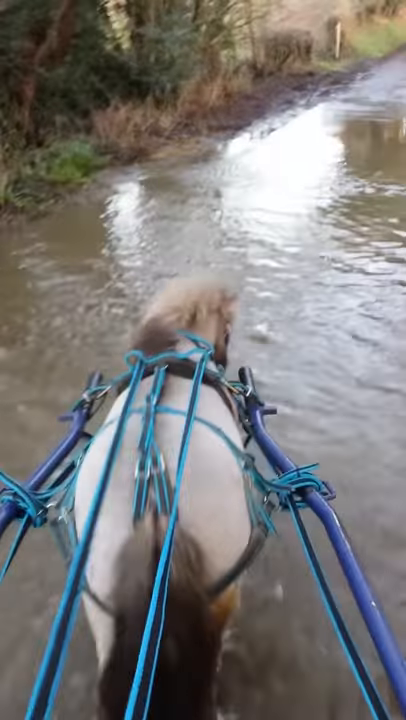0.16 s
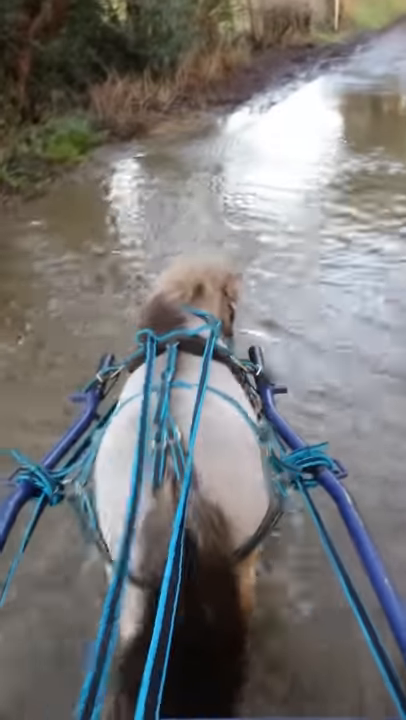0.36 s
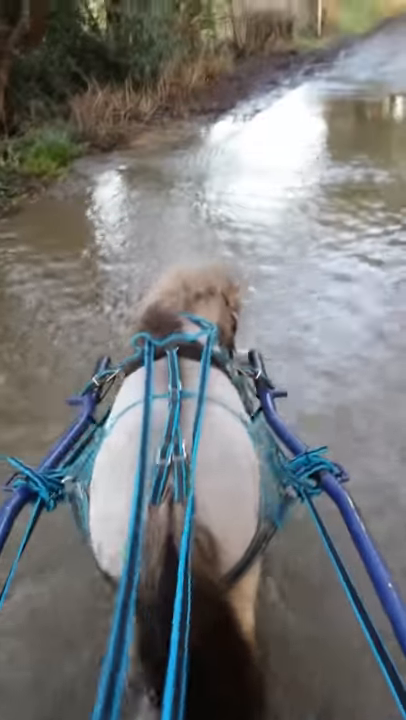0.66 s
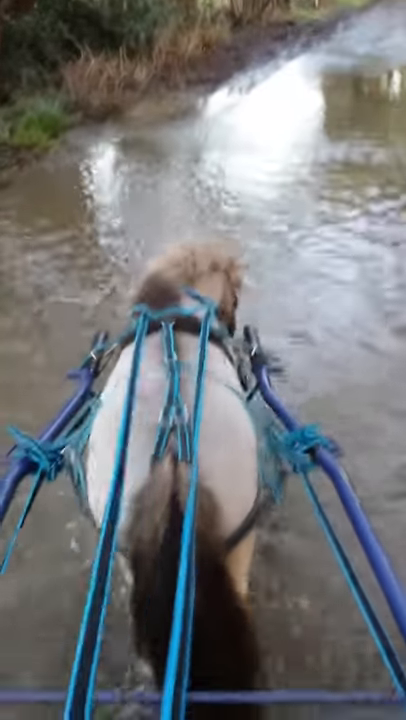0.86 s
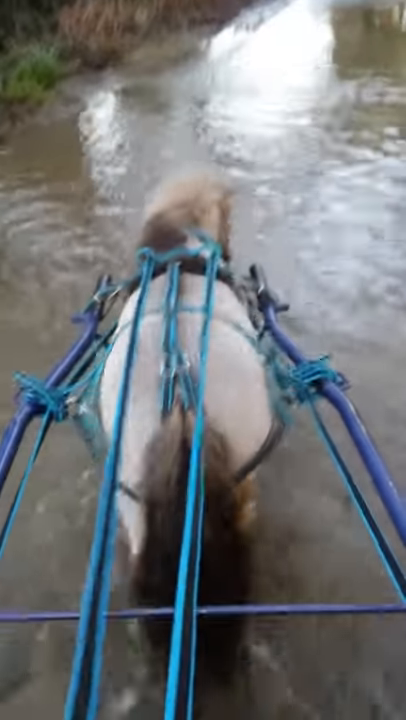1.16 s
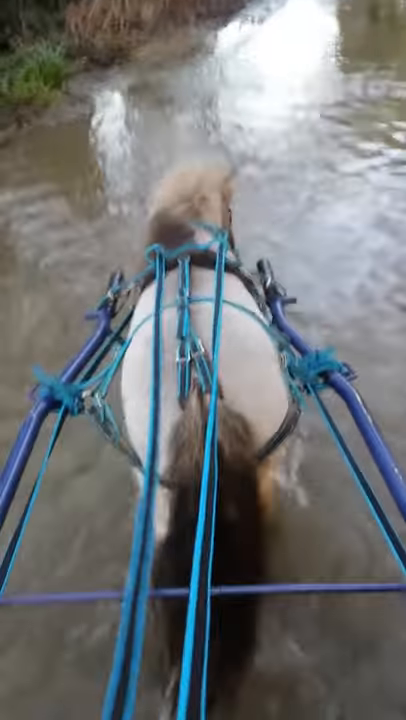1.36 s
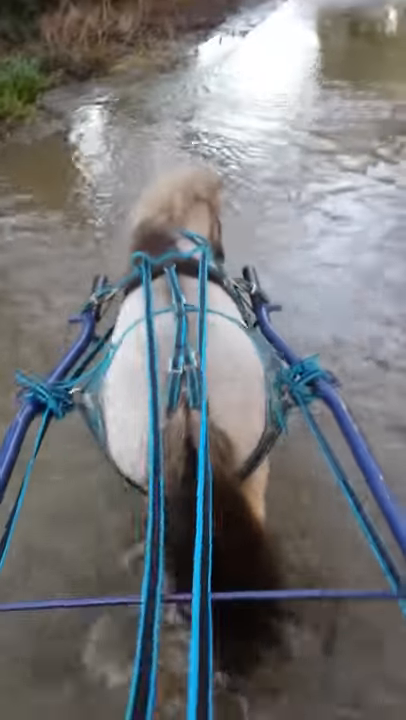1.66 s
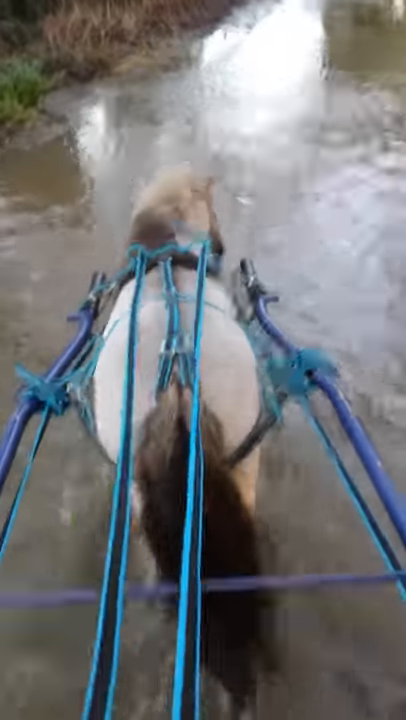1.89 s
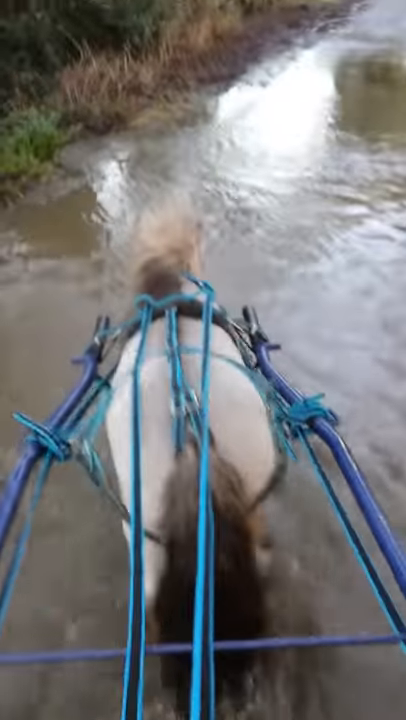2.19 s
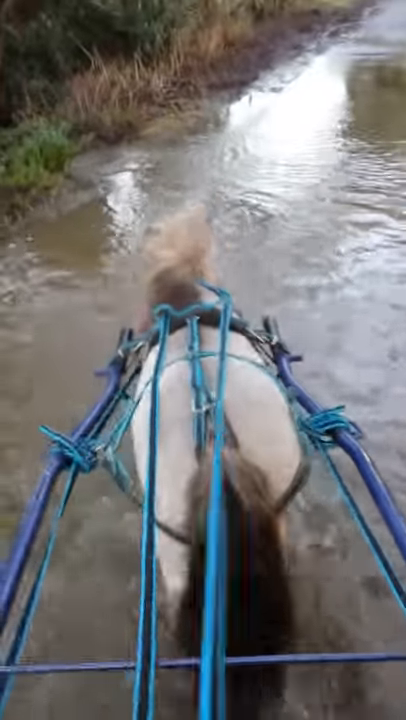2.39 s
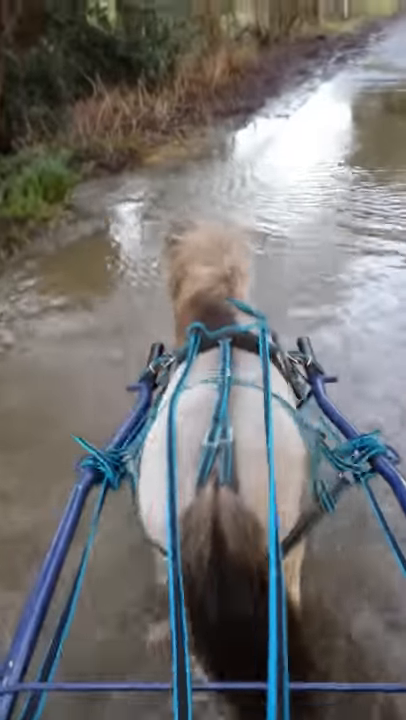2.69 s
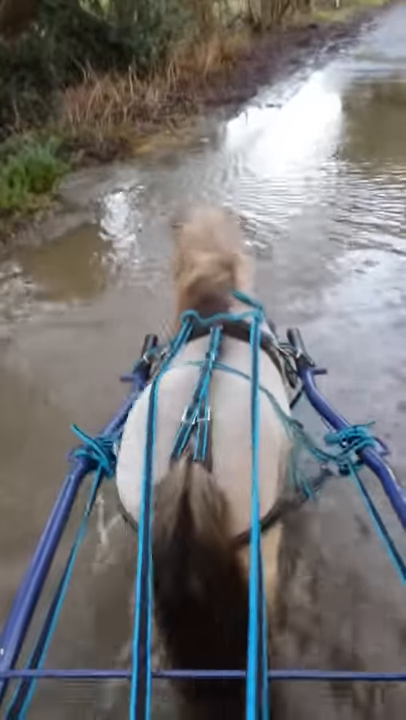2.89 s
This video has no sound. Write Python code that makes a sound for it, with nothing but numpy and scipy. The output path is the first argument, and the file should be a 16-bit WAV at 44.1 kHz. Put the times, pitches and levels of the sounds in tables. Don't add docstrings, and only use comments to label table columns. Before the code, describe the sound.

From 0 to 3 seconds, a pony pulls a cart through floodwater, heard close from the seat. A steady hissing rush carries splashes roughly every quarter second, with hollow glugs, ringing bubbles and fine drops. Sharp slaps stand out near 0.2, 1.2, 1.8, 2.2 and 2.7. Low wind thumps hit the right microphone from 1.5, strongest around 2.3 to 2.8, then ease.

```python
import sys
import numpy as np
from scipy import signal
from scipy.fft import rfft, irfft
from scipy.io import wavfile
from scipy.ndimage import uniform_filter1d

SR = 44100
rng = np.random.default_rng(int(sys.argv[2]) if len(sys.argv) > 2 else 0)


def int16_out(signal):
    q = np.round(np.clip(np.atleast_2d(signal).T, -1, 1) * 32767)
    wavfile.write(sys.argv[1], SR, q.astype(np.int16))


def magnitude_from_level(level_db):
    exponent = np.asarray(level_db, float) / 20
    return 10 ** exponent


N = 134064

# time in seconds, spray level in dB, froth level in dB,
# spray decay in seconds.
STRIDES = [(0.0, -31, -30, .05), (0.213, -26.5, -30.5, 0.06), (0.493, -33.5, -33, 0.022),
           (0.688, -28, -27.5, 0.11), (0.991, -32.5, -34.5, 0.029), (1.187, -29.5, -30.5, 0.13),
           (1.489, -28, -34, 0.029), (1.7, -24.5, -28.5, 0.054), (1.98, -30.5, -33, 0.052),
           (2.215, -26, -28, 0.035), (2.489, -33, -32.5, 0.03), (2.621, -32, -41.5, 0.091),
           (2.719, -34, -27.5, 0.1), (2.986, -32, -30, 0.27)]
# loudest moment in seconds, peak in dB, pitch in Hz.
LARGE_BUBBLES = [(0.007, -21, 620), (0.018, -25, 720), (0.048, -18.5, 673), (0.058, -18, 570),
                 (0.239, -10.5, 658), (0.253, -19, 720), (0.295, -18.5, 610), (0.534, -22.5, 654),
                 (0.563, -21, 590), (0.727, -17, 620), (0.749, -22, 800), (0.764, -17.5, 625),
                 (1.248, -11.5, 672), (1.262, -28, 656), (1.288, -18, 745), (1.721, -19.5, 790),
                 (1.732, -16, 733), (2.302, -19.5, 684), (2.513, -24.5, 990), (2.634, -22.5, 640),
                 (2.654, -25, 597), (2.765, -34, 680), (2.807, -21, 665), (3.033, -19.5, 777)]
# start in seconds, peak in dB, pitch in Hz, decay in seconds.
PLOPS = [(.009, -20, 1800, 0.0037), (.045, -22, 1000, .004), (.212, -35, 940, 0.0028),
         (0.232, -23, 1110, 0.0045), (0.4954, -15, 315, 0.0049), (.4955, -16, 548, 0.0056),
         (0.525, -19, 1150, 0.0047), (.697, -21, 1210, 0.0056), (0.768, -19, 1210, 0.0033),
         (0.91, -22, 1380, 0.0056), (.946, -24.5, 960, 0.0067), (0.992, -12.5, 1260, .0015),
         (.991, -17, 516, 0.0035), (1.085, -22.5, 1100, 0.0047), (1.193, -21, 1307, .007),
         (1.24, -14, 750, 0.0039), (1.28, -18, 987, 0.004), (1.477, -18.5, 920, 0.0041),
         (1.501, -24, 1510, 0.0028), (1.699, -20.5, 1224, 0.013), (1.74, -22, 716, .006),
         (1.768, -19, 780, 0.009), (1.979, -24, 1000, 0.0084), (2.216, -12, 1220, 0.0021),
         (2.248, -21, 905, 0.0076), (2.264, -27, 624, .006), (2.292, -20.5, 957, 0.0096),
         (2.336, -23.5, 830, 0.0058), (2.5, -21.5, 990, 0.0036), (2.608, -24, 1420, 0.003),
         (2.63, -20, 898, 0.0069), (2.634, -23, 1370, 0.0076), (2.722, -22, 795, 0.0069),
         (2.73, -19, 1440, .003), (2.744, -16, 1170, 0.0026), (2.753, -19.5, 644, 0.0054),
         (2.769, -23, 930, 0.0034), (2.802, -25, 1000, 0.0046), (2.82, -23.5, 944, 0.0094),
         (2.837, -25, 850, .008), (2.993, -18.5, 1250, .005), (3.01, -14, 940, 0.0037),
         (2.54, -25, 955, .012), (.233, -19.5, 630, .008), (.109, -19.5, 1140, 0.0076)]
# loudest moment in seconds, peak in dB, pitch in Hz,
# length in cycles.
GLUGS = [(0.063, -15, 215, 4.6), (.295, -20, 249, 2.46), (0.568, -21.5, 208, 4.3), (0.766, -29, 230, 3.7),
         (0.991, -24, 290, 2.2), (1.053, -27, 230, 7.5), (1.283, -25.5, 304, 3.6),
         (1.575, -21.5, 203.4, 9.2), (1.782, -20, 240, 5.2), (2.001, -20, 315, 3.44),
         (2.033, -27, 260, 4.8), (2.061, -26, 240, 4.5), (2.301, -24, 273, 3.4), (3.01, -28, 260, 3.4),
         (2.52, -23, 322, 3.2), (2.631, -16, 312, 3.24)]
# loudest moment in seconds, peak in dB, pitch in Hz, length in cycles.
RISER = (2.686, -22.5, 600, 17)
# loudest moment in seconds, peak in dB, pitch in Hz.
DROPS = [(.299, -28, 2300), (0.346, -24.5, 3320), (0.466, -30, 7350), (0.772, -24.5, 2700),
         (.808, -25, 7500), (0.156, -26.5, 3100), (.141, -24, 7900), (.172, -22, 7370), (0.572, -27, 5710),
         (.698, -17.5, 8800), (.821, -25.5, 3160), (.851, -25, 8000), (0.883, -25, 3900), (0.93, -26, 3160),
         (1.13, -26, 7920), (1.5, -24.5, 2860), (1.71, -19.5, 4090), (1.7133, -18.5, 6300),
         (1.733, -27, 3160), (0.214, -23, 5200), (2.315, -30, 2410), (2.517, -26.5, 2980),
         (2.7325, -22, 3610), (2.753, -23, 2550), (2.79, -24, 2500), (2.804, -22, 2630),
         (1.167, -19.5, 3930), (1.181, -27, 7300), (1.2058, -13.5, 3800), (1.223, -25, 7300),
         (1.276, -17.5, 4330), (1.606, -22.5, 7300), (1.787, -17, 6130), (2.524, -19.5, 7760),
         (2.687, -18, 7760)]
# time in seconds, peak in dB.
SMACKS = [(0.2129, -7.5), (0.2268, -15), (0.6968, -18), (0.9911, -28), (1.2036, -6), (1.701, -18),
          (1.7871, -10.5), (2.2164, -9.5), (2.7104, -11.5), (2.7302, -6), (3.0091, -24)]
# time in seconds, level in dB.
GUST = [
    (0.0, -52.5),
    (2.74, -42),
    (3.04, -51),
]
# time in seconds, peak in dB, pitch in Hz.
EDDIES = [(1.474, -16, 104), (1.847, -15, 109), (1.867, -22, 112), (1.893, -13.5, 96), (1.91, -40, 99),
          (1.928, -23, 119), (2.011, -14.5, 155), (2.221, -14, 150), (2.235, -12, 151), (2.26, -11.5, 146),
          (2.331, -31, 140), (2.348, -7.5, 135), (2.375, -16.5, 95), (2.431, -18, 100), (2.463, -23, 143),
          (2.482, -14.5, 131), (2.5, -15.5, 118), (2.544, -7.5, 176), (2.559, -25, 162), (2.58, -13.5, 114),
          (2.599, -14.5, 113), (2.626, -16, 118), (2.649, -11.5, 135), (2.674, -8.5, 139),
          (2.696, -12, 130), (2.712, -12, 130), (2.745, -10.5, 190), (2.767, -6.5, 190), (2.781, -25, 213)]
# frequency in Hz, gain in dB.
LEFT_COLOUR = [(200, 7), (420, -1), (700, 4.5), (1800, 3.5), (3800, 8), (7000, 0), (10300, -12),
               (14500, -26)]
# frequency in Hz, gain in dB.
RIGHT_COLOUR = [(200, 8), (420, -7.5), (700, 7), (1800, 4), (5000, 4.5), (7200, 9.5), (10500, 1),
                (14500, -5)]
# frequency in Hz, likeness from 0 to 1.
LIKENESS = [(200, 1), (700, 0.89), (1400, 0.61), (3000, 0), (6000, 0.15)]

BUBBLE_WOBBLE = 0.22


def read(points, hz):
    f, value = np.transpose(points)
    return np.interp(np.log(hz + 1), np.log(f + 1), value)


def evened(x):
    return x / np.sqrt(np.mean(x ** 2) + 1e-20)


def add(mix, s, sound):
    at = round(s * SR) - len(sound) // 2
    sound = sound[max(-at, 0):]
    part = mix[max(at, 0):][:len(sound)]
    part += sound[:len(part)]


def band(x, low_hz, top_hz):
    sos = signal.butter(2, [low_hz, min(top_hz, SR / 2.1)], "band", fs=SR, output="sos")
    return signal.sosfilt(sos, x)


def blip(hz, cycles, glide, lean=0.67, phase=0.):
    u = np.linspace(0, 1, int(cycles / hz * SR) + 2)
    swell = np.sin(np.pi * u ** lean) ** 2
    turns = cycles * (u + glide * (u * u - u) / 2)
    return swell * np.sin(2 * np.pi * turns + phase)


def rough(sound, hz, share):
    wobble = uniform_filter1d(rng.standard_normal(4000), size=int(SR / hz))[:len(sound)]
    return sound * (1 + share * wobble / wobble.std())


def grains(per_s, low_hz, top_hz, cycles, glide, spread_db, pitches=24):
    size = magnitude_from_level(spread_db * np.minimum(rng.exponential(1, (2, N)), 5))
    size = size * (rng.random((2, N)) < per_s / SR)
    kind = rng.integers(0, pitches, (2, N))
    swarm = np.zeros((2, N))
    for k, hz in enumerate(np.geomspace(low_hz, top_hz, pitches)):
        one = blip(hz, cycles, glide)[None]
        swarm += signal.oaconvolve(size * (kind == k), one, axes=1)[:, :N]
    return evened(swarm)


def churn():
    a, b, c, d, patches = rng.standard_normal((N // 64 + 5, 129, 5)).T
    patches = uniform_filter1d(patches, size=4, axis=0)
    patches = evened(uniform_filter1d(patches, size=25, axis=1))
    z = np.array([a + 1j * b, c + 1j * d]) * magnitude_from_level(1.8 * patches)
    return evened(signal.istft(z, nperseg=256, noverlap=192)[1][:, :N])


def steady_rush():
    hiss = magnitude_from_level(-33.5) * churn()
    fizz = magnitude_from_level(-45.5) * grains(2500, 1316, 13000, cycles=5.24, glide=0.41, spread_db=5.4)
    gurgle = magnitude_from_level(-43.5) * grains(300, 236.3, 1463, cycles=6.7, glide=0.35, spread_db=1.5)
    return hiss + fizz + gurgle


def strides():
    swing_s, swing_db, froth_s, froth_rise_s = 0.066, -8, 0.14, 0.0011
    t, spray, froth = np.arange(N) / SR, np.zeros(N), np.zeros(N)
    for s, spray_db, froth_db, dies_s in STRIDES:
        u = t - s
        build = magnitude_from_level(swing_db) * np.exp(np.minimum(u, 0) / swing_s)
        decay = np.exp(-abs(u) / dies_s)
        spray += magnitude_from_level(spray_db) * np.where(u < 0, build, decay)
        froth += magnitude_from_level(froth_db) * np.clip(u / froth_rise_s, 0, 1) * np.exp(-(u / froth_s) ** 2)
    return spray, froth


def splashes():
    spray, froth = strides()
    flicker = magnitude_from_level(3.1 * evened(uniform_filter1d(rng.standard_normal(N), size=150)))
    sheet = evened(band(rng.standard_normal((2, N)), 1760, 13200) * flicker)
    droplets = grains(1500, 1326, 11000, cycles=2.36, glide=0.72, spread_db=2.1)
    foam = grains(1600, 450, 2400, cycles=6., glide=.3, spread_db=1.4)
    return magnitude_from_level(-4.5) * (spray * (sheet + 0.67 * droplets) + froth * foam)


def large_bubbles():
    out = np.zeros(N)
    for s, db, hz in LARGE_BUBBLES:
        bubble = blip(hz, cycles=7.3, glide=0.11, lean=0.87)
        add(out, s, magnitude_from_level(db) * rough(bubble, hz, BUBBLE_WOBBLE))
        neighbour_s = s + rng.uniform(-0.00415, .009)
        neighbour = blip(hz * rng.uniform(0.98, 1.56), cycles=7.74, glide=0.055, lean=0.12)
        add(out, neighbour_s, magnitude_from_level(db - 8) * neighbour)
    return out


def plops():
    rise_s, climb = 0.00019, 0.079
    out = np.zeros(N)
    for s, db, hz, dies_s in PLOPS:
        t = np.arange(int(4 * dies_s * SR)) / SR
        envelope = (1 - np.exp(-t / rise_s)) * np.exp(-t / dies_s)
        ring = envelope * np.sin(2 * np.pi * hz * (t + climb * t * t / dies_s / 2))
        add(out, s + 2 * dies_s, magnitude_from_level(db - 2) * rough(ring, hz, BUBBLE_WOBBLE))
    return out


def glugs():
    out = np.zeros(N)
    for s, db, hz, cycles in GLUGS:
        add(out, s + 0.0012, magnitude_from_level(db) * blip(hz, cycles, glide=0.25, lean=0.78, phase=np.pi))
    return out


def riser():
    out = np.zeros(N)
    s, db, hz, cycles = RISER
    add(out, s, magnitude_from_level(db) * blip(hz, cycles, glide=0.97, lean=0.68))
    return out


def trapped_air():
    air = large_bubbles() + glugs() + band(plops() + riser(), 200, 9000)
    echo = np.roll(band(air, 480, 2000), round(0.014 * SR))
    direct = np.array([air, np.roll(air, shift=4)]) * magnitude_from_level(np.array([[-.6], [.4]]))
    return direct + np.array([[.15], [-.15]]) * echo


def drops():
    out = np.zeros((2, N))
    for s, db, hz in DROPS:
        for mix in out:
            phase = 7 * rng.random()
            ring = blip(hz, cycles=6 + 0.00326 * hz, glide=0.11, lean=0.53, phase=phase)
            add(mix, s, magnitude_from_level(db - 4.5) * rough(ring, hz, share=0.55))
    return out


def smacks():
    rise_s, dies_s, snap = .0003, 0.0025, 3
    out, t = np.zeros((2, N)), np.arange(-400, 400) / SR
    shape = np.where(t < 0, np.exp(t / rise_s), np.exp(-t / dies_s))
    burst = rng.standard_normal((len(SMACKS), 2, 800)) + snap * (abs(t - rise_s) < 1 / SR)
    cracks = band(burst, 490, 13000) * shape
    for (s, db), pair in zip(SMACKS, cracks):
        for mix, crack in zip(out, pair):
            add(mix, s + 0.001103, magnitude_from_level(db - 1.5) * np.tanh(crack / np.abs(crack).max()))
    return out


def ports(pair):
    hz = np.fft.rfftfreq(N, 1 / SR)
    same = np.clip(read(LIKENESS, hz), 0, 1)
    z = rfft(pair)
    left, right = irfft([z[0], same * z[0] + np.sqrt(1 - same ** 2) * z[1]], N)
    pair = np.array([left, np.roll(right, shift=6)])
    hz = abs(np.fft.fftfreq(2048, 1 / SR))
    low_cut = hz ** 2 / (hz ** 2 + 74.0 ** 2)
    colour = magnitude_from_level(np.array([read(LEFT_COLOUR, hz), read(RIGHT_COLOUR, hz)]))
    log_gain = np.log(colour * low_cut + 1e-4)
    taps = np.fft.ifft(np.exp(log_gain - 1j * signal.hilbert(log_gain).imag)).real
    return signal.oaconvolve(pair, taps[:, :1024], axes=1)[:, :N]


def wind_rumble():
    mean_db, left_follows = -45.5, 0.028
    gust_db = np.interp(np.arange(N) / SR, *np.transpose(GUST))
    left_db = mean_db + left_follows * (gust_db - mean_db)
    level = magnitude_from_level(np.array([left_db + 8.5, gust_db + 12.5]))
    lumps = magnitude_from_level(4.0 * evened(band(rng.standard_normal((2, N)), 0.6, 34)))
    return level * evened(band(rng.standard_normal((2, N)), 52, 190) * lumps)


def eddies():
    stir_db, stir_s = -21, 0.033
    t = np.arange(N) / SR
    stirred = sum(magnitude_from_level(db + stir_db) * np.exp(-((t - s) / stir_s) ** 2) for s, db, hz in EDDIES)
    out = stirred * evened(band(rng.standard_normal(N), 46, 250))
    for s, db, hz in EDDIES:
        push = blip(hz, cycles=1.88, glide=0.011, lean=0.85, phase=.8 * np.pi)
        add(out, s, magnitude_from_level(db + 3.0) * push)
        flutter = blip(1.6 * hz, cycles=2.304, glide=.01, lean=0.54)
        add(out, s + 0.00081, magnitude_from_level(db - 3.5) * rough(flutter, 4 * hz, share=0.26))
    return out


def wind():
    out = wind_rumble()
    out[1] += eddies()
    return out


def scene():
    water = steady_rush() + splashes() + drops() + smacks()
    return ports(water) + trapped_air() + wind()


def band_limit(x):
    return signal.sosfilt(signal.butter(12, 14630, fs=SR, output="sos"), x)


def record(dry):
    gate_hz, gate_db, gate_follows = 9000, np.array([-74.5, -67.5]), .6
    dry = signal.oaconvolve(dry, signal.firwin(255, 14550, fs=SR)[None], "same")
    hz, _, z = signal.stft(dry, SR, "cosine", nperseg=2048)
    loud_db = 10 * np.log10(np.sum(abs(z) ** 2, axis=1, keepdims=True) + 1e-9)
    sill_db = gate_db[:, None, None] + gate_follows * (loud_db - np.median(loud_db))
    sill = magnitude_from_level(sill_db + 1.5 * rng.standard_normal(loud_db.shape))
    z = z * ((abs(z) > sill) | (hz[:, None] < gate_hz))
    mix = signal.istft(z, SR, "cosine", nperseg=2048)[1][:, :N]
    return band_limit(mix)


dry = scene()
out = record(dry)
int16_out(out)
```